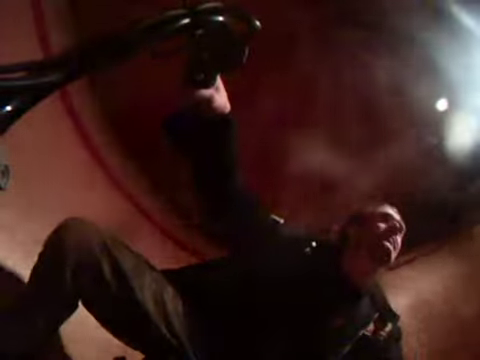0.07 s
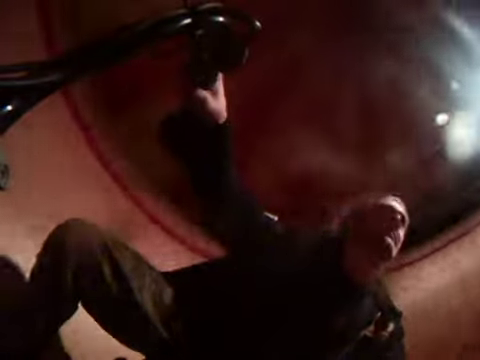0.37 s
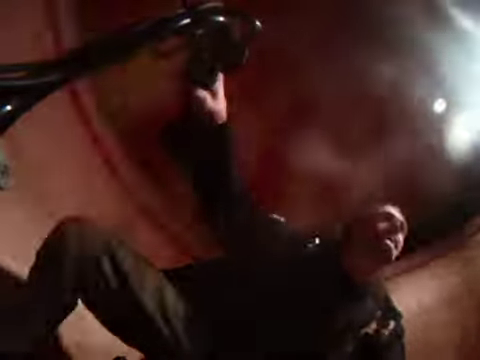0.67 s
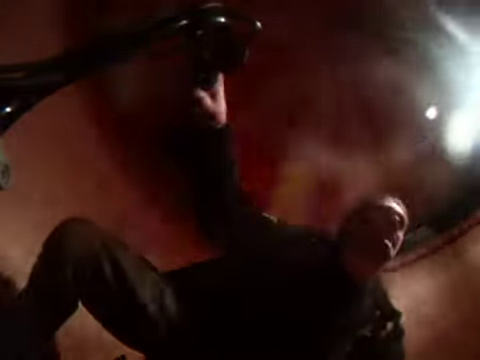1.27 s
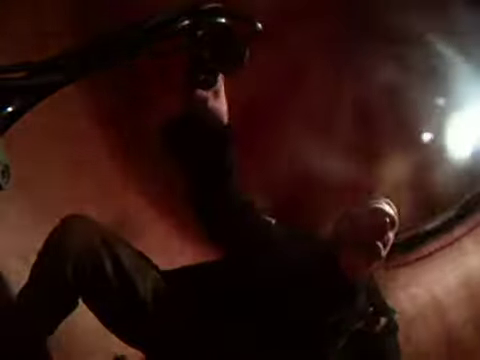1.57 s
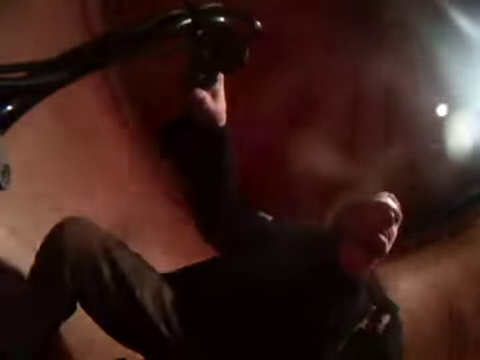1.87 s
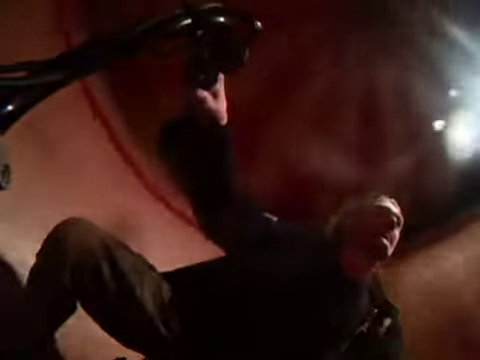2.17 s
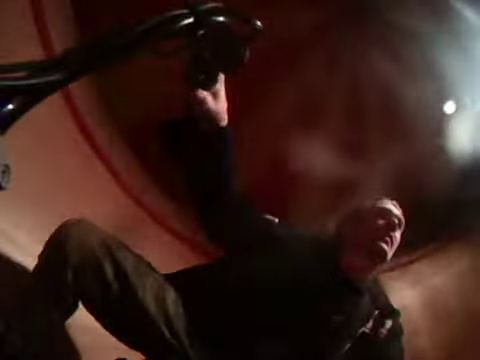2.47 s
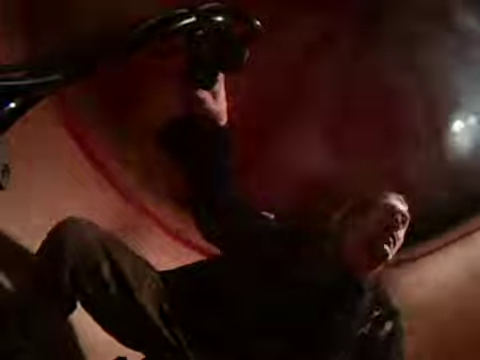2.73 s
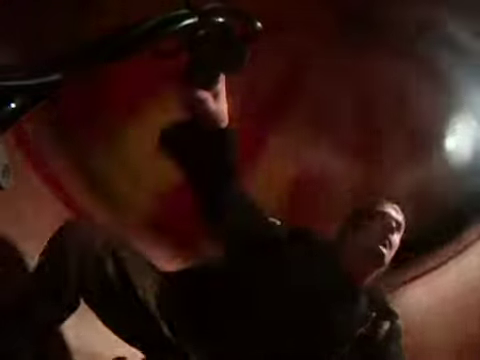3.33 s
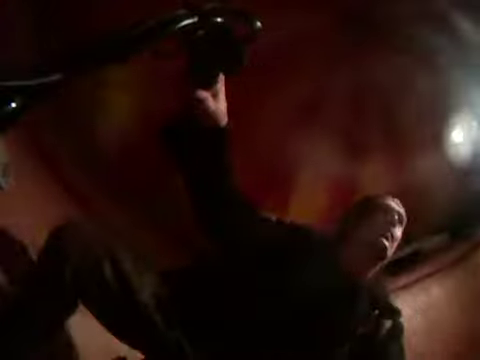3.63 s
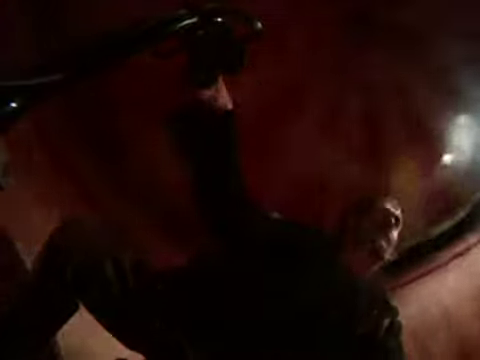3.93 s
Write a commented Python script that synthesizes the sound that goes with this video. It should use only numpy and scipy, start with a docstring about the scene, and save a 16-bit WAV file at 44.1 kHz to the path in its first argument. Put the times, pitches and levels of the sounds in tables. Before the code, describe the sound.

A motorcycle engine booms steadily, close to a small onboard microphone, as it circles a wooden wall. Metal parts rattle and whine faintly over wind and track rumble, and the sound breaks into short distorted crackles now and then.

```python
"""Motorcycle inside a wooden drum

A motorcycle circles at a nearly steady speed, heard from a small camera on the bike.
The exhaust booms at the rate the engine fires. Each firing also shakes metal parts into a rasp,
a clatter and a thin whine. Wind and track rumble underneath, and now and then the recorder
overloads and crackles."""
import sys
import numpy as np
from scipy import signal
from scipy.fft import rfft, irfft
from scipy.io import wavfile
from scipy.ndimage import uniform_filter1d

SR = 44100
rng = np.random.default_rng(int(sys.argv[2]) if len(sys.argv) > 2 else 0)


def unload_audio(sound):
    """Save the sound as a 16-bit wav file, at the path given as the first command line argument."""
    columns = np.transpose(np.atleast_2d(sound))
    # keep every value between -1 and 1, then stretch to whole-number steps
    steps = np.round(np.clip(columns, -1, 1) * 32767)
    wavfile.write(sys.argv[1], SR, steps.astype(np.int16))


N = 176400
TIME = np.arange(N) / SR


def exhaust(firing_hz):
    """Puffs of gas, one per firing, make a deep boom with weaker, unsteady overtones."""
    # the boom at the firing rate: t/s, level/dB
    boom_levels = [(0.0, -11.0), (0.11, -8.5), (0.15, -12.5), (0.21, -10.1), (0.24, -12), (0.4, -7.9),
                   (0.47, -10), (0.52, -10), (0.61, -12.5), (0.67, -9.5), (0.71, -13.2), (0.74, -10),
                   (0.98, -9), (1.03, -14), (1.06, -9.5), (1.11, -9), (1.18, -11.9), (1.23, -9.0),
                   (1.42, -8.9), (1.46, -13), (1.5, -10), (1.53, -12.0), (1.64, -7.9), (1.68, -8),
                   (1.72, -10.7), (1.8, -8), (1.92, -9.3), (1.98, -8.5), (2.15, -9.5), (2.18, -12.2),
                   (2.23, -9.3), (2.37, -12.5), (2.41, -10), (2.49, -10.5), (2.53, -9), (2.6, -12.0),
                   (2.76, -9), (2.86, -8.5), (2.9, -11), (2.94, -13.5), (2.97, -10.1), (3.05, -12.5),
                   (3.07, -12.5), (3.16, -10.5), (3.19, -12), (3.27, -13), (3.29, -10.1), (3.32, -9),
                   (3.37, -14), (3.41, -10.5), (3.43, -9), (3.48, -13.3), (3.52, -10.5), (3.56, -12),
                   (3.6, -8.2), (3.66, -9.7), (3.92, -8), (3.99, -14.2)]
    # the tone an octave above it: t/s, level/dB
    octave_levels = [(0.0, -28), (0.03, -29.5), (0.09, -29.5), (0.2, -22.5), (0.34, -25), (0.38, -30.5),
                     (0.63, -23.5), (0.98, -31), (1.05, -23.5), (1.1, -31.5), (1.2, -21.5), (1.24, -38),
                     (1.39, -38.5), (1.47, -24), (1.53, -21.5), (1.66, -35), (1.68, -51), (1.74, -21),
                     (1.79, -49), (1.83, -29), (1.86, -41), (1.92, -31), (1.98, -36.5), (2.08, -29),
                     (2.7, -25.5), (2.86, -35), (2.91, -24), (3.26, -25), (3.3, -30.5), (3.58, -21),
                     (3.61, -29.5), (3.95, -33.5), (3.98, -18), (4.0, -42)]
    # the buzz of the higher overtones: t/s, shared level/dB
    buzz_levels = [(0.0, -30), (0.03, -35), (0.31, -38.5), (0.41, -32.5), (0.44, -36.5), (0.71, -33),
                   (1.02, -41), (1.08, -33), (1.55, -39.5), (1.66, -30), (1.87, -33.5), (1.98, -27.5),
                   (2.0, -32.5), (2.44, -35), (2.46, -33), (2.56, -36.5), (2.64, -34.5), (2.86, -34.5),
                   (2.91, -32.5), (4.0, -32)]
    # those overtones: multiple of the firing rate, level added to the buzz/dB
    overtones = [(3, -2), (4, -6.5), (5, -14.5), (6, -20.5), (7, -10.5), (8, -15)]
    angle = 2 * np.pi * np.cumsum(firing_hz) / SR
    out = amp(curve(boom_levels) + 0.25 * wander(31)) * np.cos(angle)
    out += amp(curve(octave_levels) + 0.29 * wander(20)) * np.sin(2 * angle + 0.08 * wander(15))
    for multiple, db in overtones:
        gain = amp(curve(buzz_levels) + db + 1.4 * wander(9))
        out += gain * np.cos(multiple * angle + 0.42 * wander(14))
    return np.sqrt(2) * out


def metal(firing_hz):
    """The firings shake engine and frame parts, which rasp, whine and clatter."""
    # loudness of the rasps: t/s, low rasp's relative level/dB, high rasp's relative level/dB
    rasp_levels = [(0.0, -31, -28.5), (0.34, -34, -29), (0.63, -28.5, -26), (1.06, -30, -27),
                   (1.26, -26.5, -26.5), (1.46, -31.5, -29.5), (1.65, -31.5, -30.5), (1.82, -33, -26),
                   (2.08, -27, -29), (2.34, -27.5, -26.5), (2.47, -27, -27), (3.0, -27.5, -26.5),
                   (3.4, -26.5, -24.5), (3.63, -26.5, -26), (4.0, -28.5, -31.5)]
    # loudness of the whine: t/s, relative level/dB
    whine_levels = [(0.0, -38), (0.18, -45.5), (0.37, -44), (0.68, -38), (0.91, -38.5), (1.0, -41),
                    (1.28, -36.5), (1.41, -42), (1.64, -48.5), (1.86, -38.5), (2.28, -37.5), (2.83, -38.5),
                    (3.03, -36.5), (3.36, -36.5), (3.81, -39.5), (4.0, -40.5)]
    # parts that ring in the low and the high rasp: f/Hz, width/Hz, relative level/dB
    low_parts = [(1410, 64, 3), (1662, 110, 8), (1780, 35, -0.5)]
    high_parts = [(2211, 32, -5), (2325, 70.4, 6.5), (2485, 55, 1), (2638, 38, -7)]
    # tone colour of the clatter: f/Hz, relative level/dB
    clatter_spectrum = [(200, -17.5), (350, -12), (650, 0.5), (1100, -6), (1400, 9.5), (2000, -1.5),
                        (2600, 7), (3000, 0), (3400, -2.5), (3800, -17), (4100, -19), (4400, -37),
                        (4700, -76), (5200, -110)]
    whine_hz, whine_width_hz = 897.7, 36
    # the metal follows the engine's speed smoothly
    smoothing_s, swing_share = 0.026, 0.99
    smooth_hz = uniform_filter1d(firing_hz, int(smoothing_s * SR))
    mean_hz = firing_hz.mean()
    cycles = np.cumsum(mean_hz + swing_share * (smooth_hz - mean_hz)) / SR
    low_rasp = ring(shaking(cycles, grit_share=0.54, depth=0.27, lag_cycles=0.2772), low_parts)
    high_rasp = ring(shaking(cycles, grit_share=0.19, depth=0.55, lag_cycles=0.59), high_parts)
    whine_shake = shaking(cycles, grit_share=0.04, depth=0.3, lag_cycles=0.33)
    whine = ring(whine_shake, [(whine_hz, whine_width_hz, 0)])
    clatter = colour(shaking(cycles, grit_share=1, depth=0.27, lag_cycles=0.8), clatter_spectrum)
    low_db, high_db = curve(rasp_levels), curve(rasp_levels, column=2)
    clatter_db = -28 + 0.26 * (low_db - low_db.mean())  # swells a little with the low rasp
    rasp = amp(low_db - 2) * low_rasp + amp(high_db - 1) * high_rasp
    return rasp + amp(curve(whine_levels) + 3) * whine + amp(clatter_db) * clatter


def shaking(cycles, grit_share, depth, lag_cycles):
    """A knock at each firing, mixed with gritty noise that surges twice per cycle."""
    late = cycles - lag_cycles + 0.004 * wander(12)
    firing_count = np.floor(late)
    knocks = np.diff(firing_count, prepend=firing_count[0]) * amp(2.7 * wander(60))
    surge = np.exp(depth * (np.cos(4 * np.pi * late) + 0.32 * np.cos(2 * np.pi * late)))
    grit = surge * rng.standard_normal(N)
    return np.sqrt(1 - grit_share) * unit(knocks) + np.sqrt(grit_share) * unit(grit)


def ring(shake, parts, top_hz=4200):
    """Each shaken metal part rings in a narrow band round its own pitch."""
    f = np.fft.rfftfreq(N, 1 / SR)
    response = sum(amp(db) / (1 + 1j * (f - hz) / width) ** 2 for hz, width, db in parts)
    return unit(irfft(rfft(shake) * response * (f < top_hz), N))


def crackle(wave, notch_gap_s=0.00036):
    """At each listed overload, one to three tiny notches pull the wave toward zero."""
    # overloads: t/s, relative level/dB of body, edge and spit, notches in a row
    # (three at most; a fraction makes a weaker notch)
    overloads = np.array([(0.4254, -6, -14.5, -41.5, 1), (0.4362, -8, -13.6, -66, 0.93),
                          (0.7448, -17, -15, -34.5, 1), (0.7782, -9, -14, -40, 1.1),
                          (0.844, -28, -36.5, -41.5, 0.88), (1.1077, -4.5, -15.5, -39, 1.7),
                          (1.2292, -1.5, -21, -32.5, 1.3), (1.2395, -8, -14, -39, 0.86),
                          (1.2449, -6.5, -15, -44, 2), (1.2608, -2.5, -21, -66, 0.78),
                          (1.2935, -8.5, -14, -50, 1), (1.3044, -11.0, -13.2, -64, 1),
                          (1.3263, -9.5, -13.3, -43.5, 0.88), (1.3477, -6.5, -13.5, -40.5, 0.79),
                          (1.369, -7, -12, -65.0, 1.2), (1.3805, -10, -13, -69, 1.6),
                          (1.3907, -8, -12.9, -34, 1), (1.396, -8, -16, -69, 1),
                          (1.4014, -5, -14.5, -57, 1.1), (1.4227, -6.5, -15, -67.5, 1.8),
                          (1.5901, -7.5, -12.5, -52, 1.2), (1.6422, -7, -13.2, -41, 1),
                          (1.647, -6, -15, -31, 4.2), (1.652, -7, -16, -67.5, 2),
                          (1.658, -7, -14.0, -30, 1), (1.663, -8.5, -10, -55, 0.91),
                          (1.6679, -4, -13.5, -24.5, 0.95), (1.673, -6.5, -13.9, -65.0, 1.3),
                          (1.6784, -6.5, -15.5, -32, 1.2), (1.762, -6, -13.5, -31.5, 0.88),
                          (1.7828, -8, -17, -41, 0.88), (1.7877, -5.5, -14, -38, 1.3),
                          (1.7928, -11, -14.0, -44, 0.82), (1.8038, -4, -20.5, -63, 1),
                          (1.8249, -15.5, -13.6, -70, 0.78), (1.836, -2.5, -24, -65.0, 1.5),
                          (1.8472, -8, -13, -49.5, 1.2), (1.8686, -1.5, -23, -66, 1.3),
                          (1.879, -14, -16.5, -30.5, 0.86), (1.8901, 0, -24, -68, 0.7),
                          (1.9547, -5, -15, -33, 2), (1.9605, -10, -16, -41, 0.83),
                          (1.9658, -2, -24, -67, 1.1), (2.0967, -11.4, -15, -46, 0.88),
                          (2.1398, -9.5, -15, -69, 1), (2.2169, -10, -12.5, -68.5, 1.1),
                          (2.4267, -8, -14.5, -40, 1), (2.737, -9, -12, -40, 0.86),
                          (2.748, -6.5, -15.2, -70, 1.4), (2.791, -6, -12, -43, 0.77),
                          (2.8131, -5, -11, -41, 0.79), (2.824, -35, -29.5, -50.5, 1),
                          (2.8344, -7.5, -15, -43, 1), (2.8453, -8, -17.5, -38, 1),
                          (2.8562, -7, -10.5, -35, 1), (2.8666, -12, -15, -69, 1.3),
                          (2.8891, -6.5, -12.5, -70, 0.89), (3.4152, -25.5, -32, -45, 1.1),
                          (3.449, -25, -40.5, -38, 0.92), (3.6048, -8, -14, -36, 1.1),
                          (3.6158, -7, -15.5, -39, 1), (3.627, -30.5, -32.5, -39.5, 1.1),
                          (3.7574, -6, -13.5, -65.0, 0.73), (3.7783, -29.5, -30, -43.5, 1),
                          (3.8323, -7, -13, -64, 0.74), (3.8429, -6, -13.8, -44.5, 1),
                          (3.8746, -11, -15.5, -71, 2), (3.8802, -11, -11, -59, 1),
                          (3.8847, -7.5, -13, -34, 1), (3.8898, -1.5, -27, -68, 1),
                          (3.8957, -3, -18, -45, 1), (3.9007, -6, -18, -31, 1.5),
                          (3.906, -5, -12, -33, 1.7), (3.9116, -5.5, -14.5, -32.5, 1.7),
                          (3.9157, -2.5, -26, -60, 0.89)])
    # tone colours of a crackle's dull body, sharp edge and thin spit: f/Hz, relative level/dB
    body = [(60, -15), (300, -1.5), (2000, -0.5), (2700, -10.5), (3300, -15.5), (4300, -63), (4800, -100)]
    edge = [(1500, -33.5), (2500, -10.5), (3000, -2.5), (3700, 0.5), (4000, -3.5), (4300, -18.5),
            (4600, -40.5), (5000, -89.5)]
    spit = [(2500, -31.5), (4300, 0.5), (6000, -4), (8500, -6.5), (11000, -10), (13000, -17.5),
            (15900, -28.5)]
    starts = np.round(overloads[:, 0] * SR).astype(int)
    out = np.zeros(N)
    for column, (spectrum, db) in enumerate([(body, -0.5), (edge, 1), (spit, 8.5)], start=1):
        notch = colour(signal.unit_impulse(N), spectrum)
        pull = -np.sign(wave[starts]) * amp(overloads[:, column] + db)
        clicks = np.zeros(N)
        for k in range(3):
            clicks[starts + round(k * notch_gap_s * SR)] += pull * np.clip(overloads[:, -1] - k, 0, 1)
        out += irfft(rfft(clicks) * rfft(notch / notch.max()), N)  # each click takes the notch's shape
    return out


def rumble():
    """Wind and track make a low noise that gently wavers."""
    # tone colour of the rumble: f/Hz, relative level/dB
    spectrum = [(10, -12.5), (25, 0), (37, -6.5), (52, -0.5), (66, 2), (120, 0), (150, -9), (220, -11.5),
                (400, -15), (1000, -77), (4000, -120)]
    return amp(-30.5 + 1.5 * wander(6)) * colour(rng.standard_normal(N), spectrum)


def amp(db):
    """Turns decibels into a factor to multiply by."""
    return 10 ** (np.asarray(db) / 20)


def unit(x):
    """Scales a signal to an average size (rms) of 1."""
    return x / np.sqrt(np.mean(x ** 2) + 1e-20)


def curve(table, column=1):
    """Joins the points of a time table with straight lines."""
    rows = np.array(table)
    return np.interp(TIME, rows[:, 0], rows[:, column])


def colour(x, spectrum):
    """Filters x by a list of (f/Hz, level/dB) points; the result has average size 1."""
    hz, db = np.transpose(spectrum)
    f = np.fft.rfftfreq(N, 1 / SR)
    gain = amp(np.interp(np.log(f + 1), np.log(hz), db))
    return unit(irfft(rfft(x) * gain, N))


def wander(rate_hz):
    """A smooth random wobble of average size 1, up to about rate_hz fast."""
    f = np.fft.rfftfreq(N, 1 / SR)
    return unit(irfft(rfft(rng.standard_normal(N)) * np.exp(-(f / rate_hz) ** 2), N))


def scene():
    """One firing rate drives exhaust and metal, over the rumble, in one channel."""
    # how often the engine fires: t/s, f/Hz
    firing_rates = [(0.0, 89.37), (0.1, 92.6), (0.14, 89.75), (0.28, 86.25), (0.41, 95.54), (0.48, 89.2),
                    (0.55, 91.4), (0.6, 86.16), (0.66, 91.75), (0.71, 85.17), (0.78, 91.25), (0.95, 93.3),
                    (1.02, 87.97), (1.1, 91.8), (1.19, 88.6), (1.23, 93.5), (1.32, 92), (1.4, 94.17),
                    (1.52, 87.95), (1.58, 90.83), (1.62, 95.3), (1.66, 95.54), (1.72, 88.4), (1.77, 94.4),
                    (1.92, 91.67), (1.96, 94.25), (2.07, 90.08), (2.11, 93.5), (2.18, 88.7), (2.2, 92.46),
                    (2.29, 90.7), (2.36, 88.06), (2.4, 91.3), (2.48, 88.9), (2.52, 91.86), (2.63, 88.18),
                    (2.71, 92.83), (2.87, 91.42), (2.93, 86.9), (3.01, 89.7), (3.05, 86.65), (3.16, 90.54),
                    (3.19, 88.63), (3.31, 92.35), (3.37, 86.64), (3.4, 91.2), (3.56, 88.73), (3.62, 94.4),
                    (3.65, 90.95), (3.88, 94.62), (3.96, 92.0), (3.99, 88.7)]
    firing_hz = curve(firing_rates)
    return (exhaust(firing_hz) + metal(firing_hz) + rumble())[None]


def record(dry):
    """The recorder adds its crackles and cuts off the highest treble."""
    crackly = dry + crackle(dry[0])
    cutoff_hz = 15900
    treble_cut = signal.firwin(511, cutoff_hz, window=("kaiser", 9), fs=SR)
    return signal.oaconvolve(crackly, treble_cut[None], "same")


dry = scene()
out = record(dry)
unload_audio(out)
```